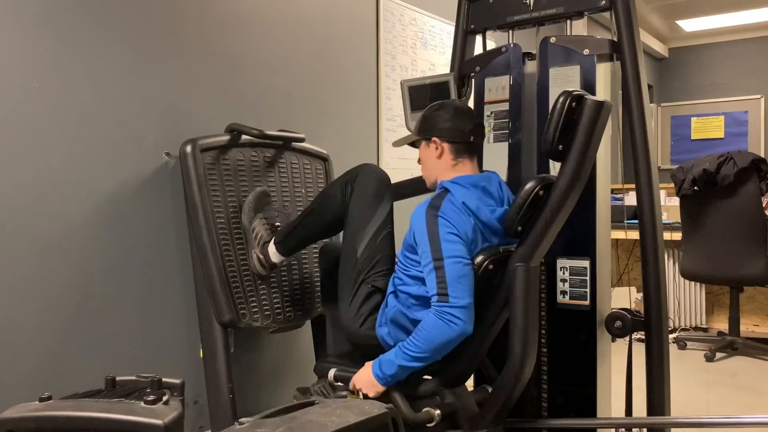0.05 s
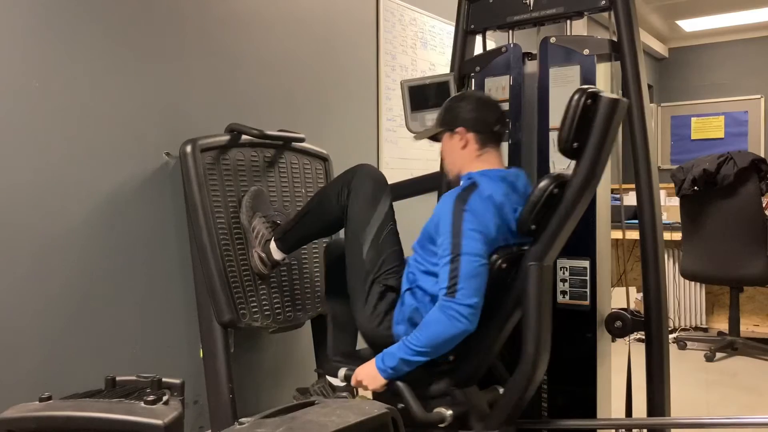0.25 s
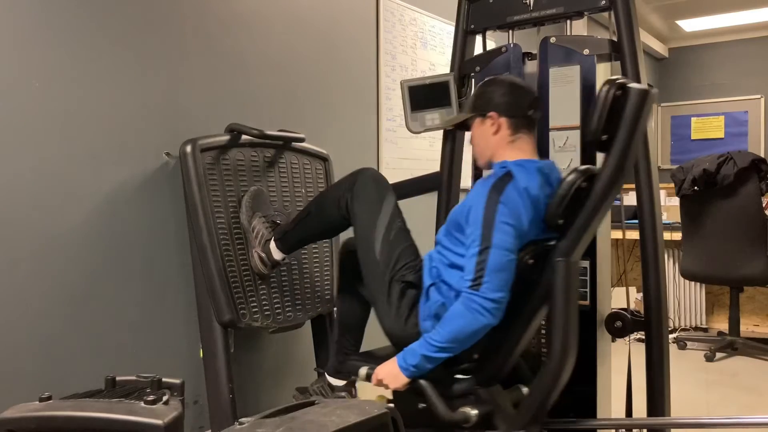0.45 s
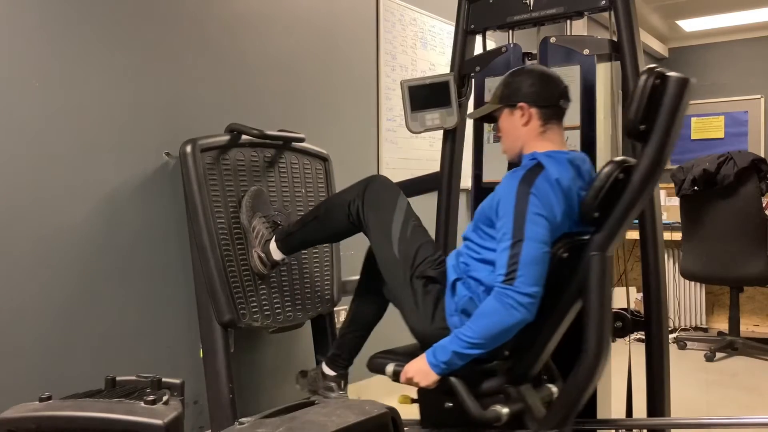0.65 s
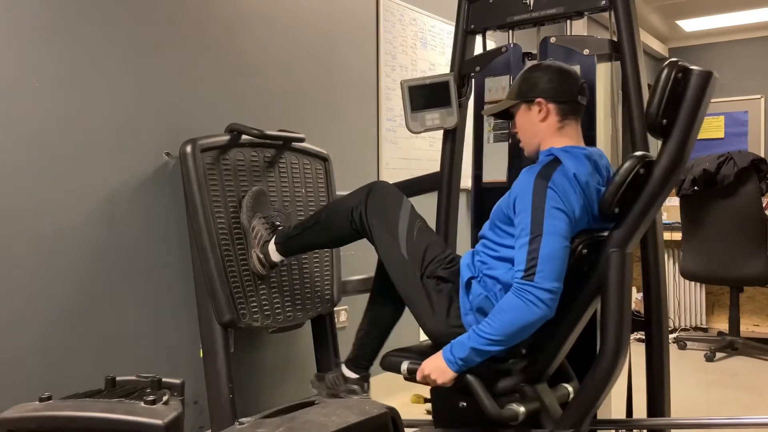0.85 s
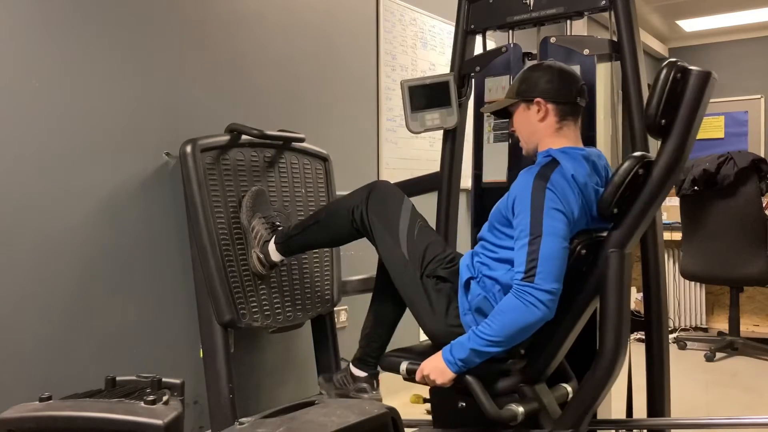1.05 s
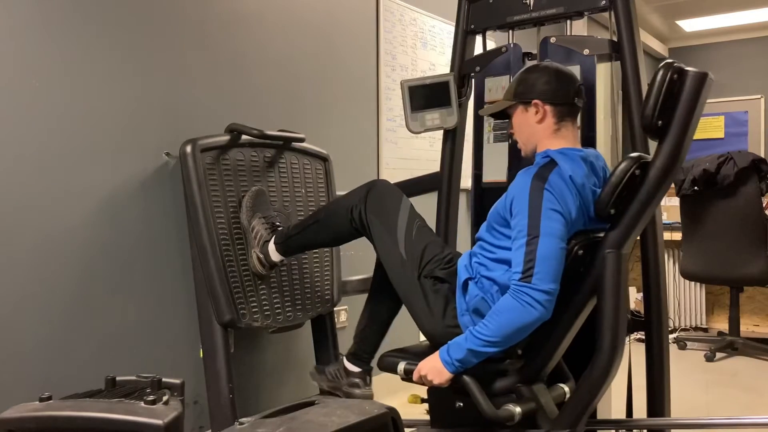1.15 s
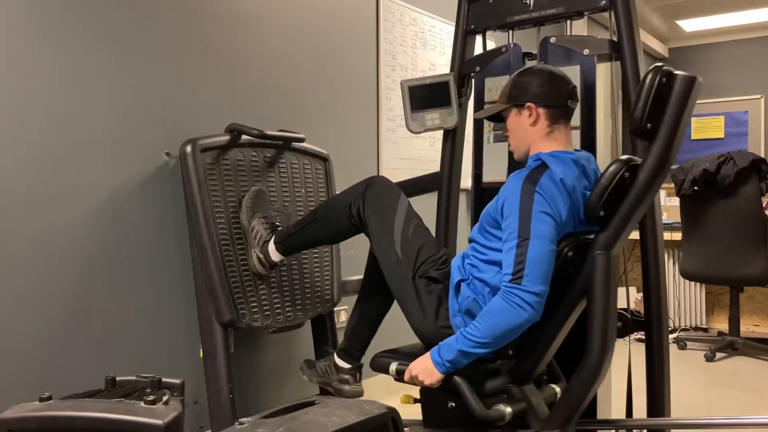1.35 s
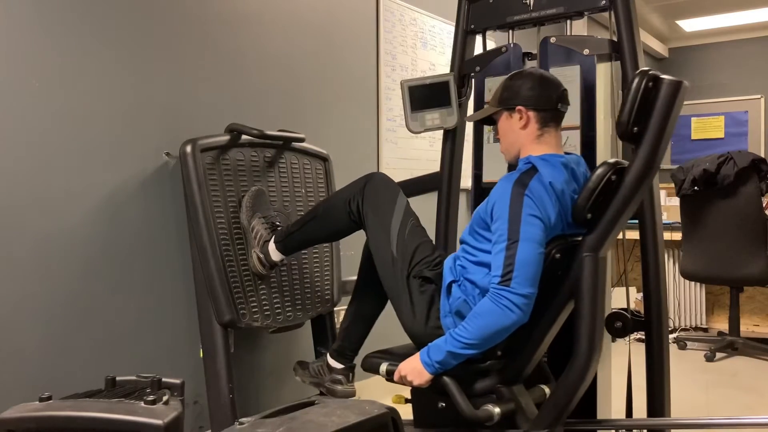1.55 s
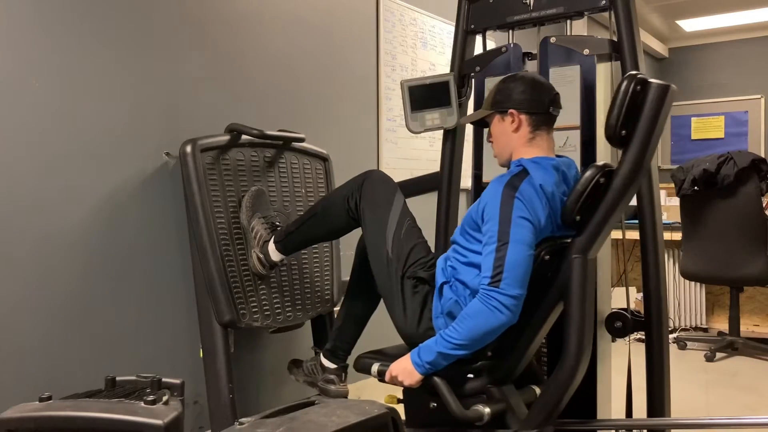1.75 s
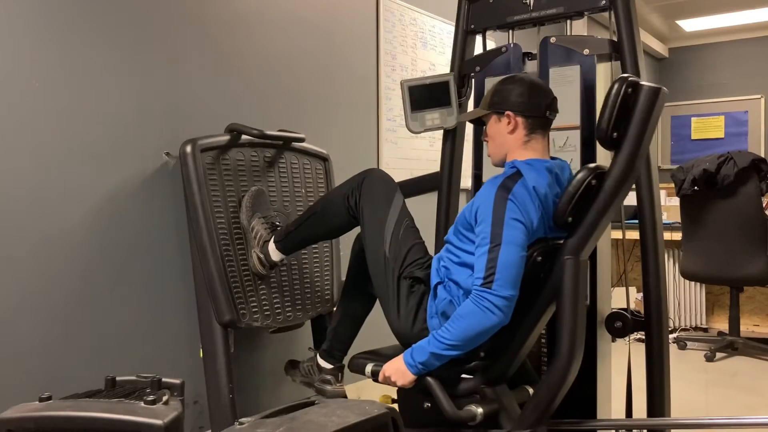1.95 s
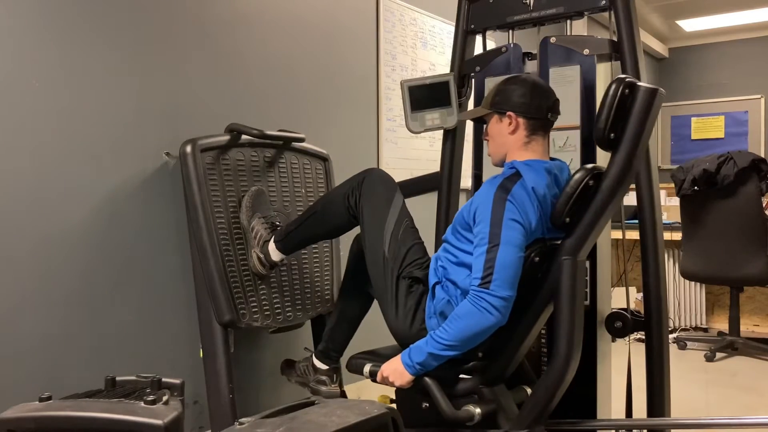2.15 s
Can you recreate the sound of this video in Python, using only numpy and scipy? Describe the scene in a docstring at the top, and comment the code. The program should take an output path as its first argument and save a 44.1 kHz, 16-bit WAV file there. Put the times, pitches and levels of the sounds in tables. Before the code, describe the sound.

A leg press clicks at 0.1 seconds and clanks at 0.2, with a short pulley squeak and a thinly ringing loose pin. Its seat judders with dull knocks, loudest from 0.25 to 0.4 seconds, and rolls out with a low rumble and faint hiss, fading by 1 second. From 1.2 it rolls softly back, with light cable ticks around 1.8 to 2. Quiet gym ventilation runs underneath.

```python
"""A click and a steel clank come first, as a leg press in a quiet gym takes up its slack.
A loose pin sings, a pulley squeaks, and the seat judders and knocks as it starts to move.
It rolls out along its rail, halts, and rolls softly back with a few ticks of the cable.
Its rollers shake the machine into a rumble, and its sleeves hiss along the guide rods.
Ventilation fills the room; two microphone ports (openings) hear the treble one after the other."""
import sys
import numpy as np
from scipy import signal
from scipy.fft import rfft, irfft, next_fast_len
from scipy.io import wavfile
from scipy.ndimage import uniform_filter1d, map_coordinates

SR = 44100
rng = np.random.default_rng(int(sys.argv[2]) if len(sys.argv) > 2 else 0)


def waveform_to_disk(signal):
    """Save audio, clipped to [-1, 1], as 16-bit WAV at the path in sys.argv[1]."""
    frames = np.transpose(np.atleast_2d(signal))
    scaled = np.clip(frames, -1, 1) * 32767
    samples = np.round(scaled).astype(np.int16)
    wavfile.write(sys.argv[1], SR, samples)


N = 97020

# Tone of the ventilation: (frequency [Hz], relative level [dB])
AIR_TONE = [(25, -78), (60, -11), (150, 7), (300, 6), (600, -9), (900, -9.5), (1600, -1.5), (3000, -6.5),
            (6000, -13.5), (9500, -26), (12000, -54), (15500, -55)]
# How long the room echoes: (frequency [Hz], time to fade by 60 dB [s])
ROOM_DECAY = [(200, 0.96), (1000, 0.26), (4000, 0.6), (12000, 0.14)]
# Hiss on the guide rods over time: (time [s], relative level [dB])
SLIDE_LEVELS = [(0.0, -104), (0.14, -63), (0.27, -69), (0.42, -59), (0.58, -59), (0.66, -61), (0.82, -72),
                (0.91, -108), (1.21, -76.5), (1.42, -69), (1.55, -71), (1.87, -72), (2.06, -75), (2.2, -99)]
# Tones of the rod hiss, the rollers' grit and a bright click: (frequency [Hz], relative level [dB])
HISS_TONE = [(2000, -32), (4000, 2), (7000, -13), (9500, -13.5), (12000, -8), (15500, -28.5)]
GRIT_TONE = [(500, 7), (900, 8), (2000, -9), (4000, -14.5), (8000, -34), (15000, -25)]
CLICK_TONE = [(500, -50), (2000, 4), (5000, 7), (9000, 2.5), (12000, 8), (15500, 5)]
# Resonances, the pitches each part likes to ring at: (frequency [Hz], width [Hz], relative level [dB])
DUCT_RESONANCES = [(892, 127, 8.5), (538, 39, 10)]
SCRAPE_RESONANCES = [(1860, 380, 0)]
PIN_RESONANCES = [(3444, 51, 6), (3570, 160, 5), (3900, 73, 0), (4264, 180, -5)]
RAIL_RESONANCES = [(152.2, 11.5, -2.5), (176, 11.3, -6.5), (195.2, 22.3, -1.5), (233.8, 24.2, -2.5)]
FRAME_RESONANCES = [(268, 24, -3), (322, 18, 0), (350, 20, 0), (432, 22, -9), (460, 22, -10), (524, 16, -5),
                    (556, 25, -11), (610, 40, -13)]
PLATE_RESONANCES = [(737, 8.8, -8), (868, 17.4, 13.5), (961, 10.3, 4), (1210, 8.3, 4.5), (1480, 104, -7.5),
                    (1923, 24, 1.5), (2450, 660, -25)]
BASE_RESONANCES = [(45, 24.8, 0), (77.8, 30.4, -5)]
PORT_RESONANCES = [(9300, 2200, 0)]
# Rubs of the seat's carriage: (time [s], length [s], level [dB])
CARRIAGE_RUBS = [(0.533, 0.1, -44.5), (0.656, 0.17, -48.5)]
# Pulley squeaks: (time [s], length [s], middle pitch [Hz], level [dB])
PULLEY_SQUEAKS = [(0.204, 0.031, 1431, -24), (.535, 0.045, 1280, -33.5)]
# The loose pin singing: (time [s], relative level [dB])
PIN_LEVELS = [(.191, -48), (.199, -28), (.232, -29), (.247, -36), (.256, -52), (.29, -52), (.3, -44),
              (.31, -50), (.32, -43), (.352, -44), (.36, -62), (.374, -60), (.381, -47), (.425, -48),
              (.44, -62), (.52, -60), (.62, -68)]
# Cable and pulley clicks: (time [s], relative level [dB], dullness [below 0 is brighter], rise time [s])
CABLE_CLICKS = [(0.0902, -50.5, 1, 0.00025), (0.0926, -40.5, 1, 0.0022), (0.188, -36.5, 0.38, 0.0039),
                (.198, -25.5, 0.94, 0.012), (1.769, -52.5, -0.9, .0002), (1.829, -50.5, -0.083, .006),
                (1.847, -50.5, -1.1, .004), (1.9422, -48.5, -0.83, 0.0016), (1.953, -57, -1.1, .0003)]
# Hits on the steel: (time [s], relative level [dB])
STEEL_HITS = [(.093, -29.5), (.197, -27), (.212, -48)]
# Notes in one clank: (frequency [Hz], relative level [dB], time to fade by 60 dB [s])
STEEL_NOTES = [(824, -1, .07), (1140, -6, .05), (1470, -2, .04), (2010, -6, .05), (2210, -4, .04),
               (2600, -8, .04), (2980, -9, .04), (3770, 1, .025), (4090, -5, .025), (4480, -4, .025),
               (6800, -12, .02), (9150, -14, .03)]
# How strongly each part rumbles: (time [s], rail [dB], frame [dB], weight plates [dB], base [dB])
RUMBLE_LEVELS = [(0.0, -56, -44.5, -56, -42), (0.08, -49.5, -62, -55, -59), (0.1, -40.5, -43.5, -44, -51),
                 (0.17, -47.5, -44, -48.5, -46), (0.21, -47, -29, -24, -60), (0.25, -29.5, -21, -21.5, -46),
                 (0.28, -40, -26, -24, -47), (0.32, -20, -20.5, -27.5, -51), (0.35, -31.5, -19, -30.5, -23),
                 (0.39, -23, -26, -30.5, -40), (0.43, -27, -20, -32.5, -31), (0.47, -30, -27.5, -34, -37.5),
                 (0.54, -27, -32.5, -34, -31), (0.56, -28, -27, -36.5, -43), (0.62, -33.5, -31.5, -38, -36),
                 (0.67, -36, -34, -37.5, -50), (0.72, -39.5, -42.5, -33.5, -43),
                 (0.75, -35.5, -36.5, -39.5, -44), (0.91, -42.5, -47.5, -51, -44),
                 (1.16, -52, -65.5, -56.5, -55), (1.49, -50, -55.5, -53, -51.5),
                 (2.2, -60, -65, -57.5, -66)]
# Knocks of the seat: (time [s], relative level [dB], pitch [Hz])
SEAT_KNOCKS = [(0.099, -25, 187), (.188, -25, 560), (0.205, -21, 374), (0.222, -15, 315), (0.2443, -3, 477),
               (0.259, -16.5, 407), (0.282, -14, 358), (0.2993, -6.5, 320), (.309, -12, 194.4),
               (0.341, -4, 351), (0.376, -3, 332), (0.395, -11, 344), (0.414, -16, 357), (.423, -21.5, 325),
               (0.437, -27, 234), (0.453, -34, 350), (0.547, -26, 215), (0.682, -18, 350),
               (0.742, -28, 232), (0.826, -32, 182), (1.118, -37.5, 153), (1.348, -33.5, 145),
               (1.535, -35.5, 170), (1.836, -39, 185), (1.854, -38.5, 148)]
# How alike the two ports sound: (frequency [Hz], likeness [0 to 1])
PORT_LIKENESS = [(100, .98), (350, .9), (800, .55), (2000, .5), (4500, .35), (6000, .6), (6800, .99),
                 (15700, .99)]
# How late the left port hears steady sounds and struck ones: (frequency [Hz], lag [cycles])
STEADY_LAG = [(300, 0), (2000, .22), (4500, .5), (6900, 1), (15950, 3)]
STRUCK_LAG = [(300, 0), (1700, .05), (3900, .05), (5200, .5), (6900, 1), (15950, 3)]
# How much louder the left port is: (frequency [Hz], left over right [dB])
PORT_BALANCE = [(100, -2.5), (500, 0), (2500, 2.5), (6000, -0.5)]


def amp(db):
    """Turn decibels into a number to multiply by."""
    return 10 ** (np.asarray(db) / 20)


def unit(x):
    """Scale a sound to an average power of 1."""
    return x / np.sqrt(np.mean(x ** 2) + 1e-20)


def along(points, hz):
    """Read between the rows of a (frequency, value) table, on a log frequency scale."""
    freqs, values = np.transpose(points)
    return np.interp(np.log(hz + 1), np.log(freqs + 1), values)


def curves(rows):
    """Turn each dB column of a time table into one gain per sample."""
    times, *columns = np.transpose(rows)
    return [amp(np.interp(np.arange(N) / SR, times, db)) for db in columns]


def wobble(rate, depth_db):
    """A gain that glides through `rate` random values a second."""
    values = rng.standard_normal(int(N * rate / SR) + 4)
    return unit(amp(depth_db * map_coordinates(values, [np.arange(N) * rate / SR])))


def filtered(x, response):
    """Change the strength and timing of each frequency in x."""
    size = next_fast_len(N + SR // 2)
    return irfft(rfft(x, size) * response(np.fft.rfftfreq(size, 1 / SR)), size)[..., :N]


def body(peaks):
    """The filter of an object that rings at these resonances."""
    return lambda f: sum((-1) ** k * amp(db) * 1j * f * width / (hz * hz - f * f + 1j * f * width)
                         for k, (hz, width, db) in enumerate(peaks))


def colour(points):
    """The filter that follows a tone table."""
    return lambda hz: amp(along(points, hz))


def grains(rate, depth_db):
    """Two gritty noises that swell together under one unsteady contact force."""
    return rng.standard_normal((2, N)) * wobble(rate, depth_db)


def even(x, window_s=0.04):
    """Soften chance swells that last longer than the window."""
    power = np.abs(uniform_filter1d(x ** 2, size=round(window_s * SR)))
    return x / np.sqrt(power + 0.27)


def add(out, start, x):
    """Mix x into out at a start time in seconds."""
    i = round(start * SR)
    out[:, i:i + x.shape[1]] += x[:, :N - i]


def ventilation(level_db=-54):
    """A steady rush of air, coloured by the ringing of its duct."""
    tone = lambda hz: amp(along(AIR_TONE, hz)) * (1 + 2 * np.abs(body(DUCT_RESONANCES)(hz)))
    return amp(level_db) * unit(filtered(rng.standard_normal((2, N)), tone))


def room_echo(x):
    """The room answers a sound, and each frequency dies away at its own speed."""
    hz, t, spectrum = signal.stft(rng.standard_normal((2, SR // 2)), SR, nperseg=256)
    fade = amp(-60 * t / along(ROOM_DECAY, hz)[:, None])
    tail = signal.istft(spectrum * fade, SR, nperseg=256)[1]
    delayed = np.pad(x, ((0, 0), (300, 0)))
    return signal.fftconvolve(delayed, tail / np.linalg.norm(tail[0]), axes=1)[:, :N]


def rod_hiss():
    """Sleeves (bushings) hiss as they slide on the guide rods."""
    level, = curves(SLIDE_LEVELS)
    return amp(7) * level * unit(filtered(grains(27, depth_db=1.2), colour(HISS_TONE)))


def carriage_scrapes():
    """The carriage under the seat rubs, with a gritty sound that swells and fades."""
    t = np.arange(N) / SR
    level = sum(amp(db) * np.sin(np.pi * np.clip((t - start) / length, 0, 1))
                for start, length, db in CARRIAGE_RUBS)
    return level * unit(filtered(grains(67.3, depth_db=3.0), body(SCRAPE_RESONANCES)))


def pulley_squeaks(pitch_rise=0.12):
    """The pulley gives short, rough tones that climb in pitch as they swell and fade."""
    out = np.zeros((2, N))
    for start, length, hz, db in PULLEY_SQUEAKS:
        t = np.arange(round(length * SR)) / SR
        jitter = 0.069 * np.cumsum(rng.standard_normal((2, SR // 10)), axis=1)[:, :len(t)]
        phase = 2 * np.pi * hz * t * (1 + pitch_rise * (t / length - 1) / 2)
        add(out, start, amp(db) * np.sin(np.pi * t / length) * np.sin(phase + jitter))
    return out


def loose_pin(settled_hz=3545, sag_hz=45, settle_s=0.08):
    """A loose pin rattles and sings an unsteady note that sags in pitch."""
    t = np.arange(N) / SR
    start, end = PIN_LEVELS[0][0], PIN_LEVELS[-1][0]
    level, = curves([(start - 0.01, -90)] + PIN_LEVELS + [(end + 0.2, -90)])
    wander = 0.53 * np.log([wobble(120, depth_db=8.7), wobble(120, depth_db=8.7)])  # radians
    hz = settled_hz + sag_hz * np.exp(-np.abs(t - start) / settle_s)
    rattle = unit(filtered(grains(90, depth_db=4), body(PIN_RESONANCES)))
    tone = np.sin(2 * np.pi * np.cumsum(hz) / SR + wander + [[0], [np.pi / 2]])
    return amp(3) * level * tone + amp(-4.5) * uniform_filter1d(level, size=SR // 30) * rattle


def cable_clicks(dull_db_per_octave=7.5):
    """Cable and pulley crack: each click is a tick of noise and a dying rattle."""
    out, t = np.zeros((2, N)), np.arange(SR // 6) / SR
    hz = np.fft.rfftfreq(len(t), 1 / SR)
    octaves = np.log2((hz + 300) / 11000)
    fade = amp(-4 - 60 * t / 0.0018) + amp(-60 * t / 0.039) + amp(-13.5 - 60 * t / 0.2)
    for start, db, dullness, rise in CABLE_CLICKS:
        tone = amp(along(CLICK_TONE, hz) - dullness * dull_db_per_octave * octaves)
        noise = irfft(rfft(rng.standard_normal((2, len(t)))) * tone, len(t))
        add(out, start, amp(db) * noise * fade * (1 - np.exp(-t / rise)))
    return out


def steel_clanks(rise_s=0.005):
    """The pin that selects the weight and the top plate ring with many short notes at once."""
    out, t = np.zeros((2, N)), np.arange(SR // 3) / SR
    for start, db in STEEL_HITS:
        ring = np.zeros((2, len(t)))
        for hz, note_db, decay_s in STEEL_NOTES:
            chance = rng.standard_normal(3)  # varies the note's level and its two phases
            fade = amp(note_db + 2 * chance[0] - 60 * t / decay_s)
            ring += fade * np.sin(2 * np.pi * hz * t + 3 * chance[1:, None])
        add(out, start, amp(db) * ring * (1 - np.exp(-t / rise_s)))
    return out


def seat_rolling(stop_s=1.87, stop_fade_s=0.078, stop_db=-8):
    """Rollers shake the rail, frame, weight plates and base; the rail quietens as the seat stops."""
    rail_level, frame_level, plate_level, base_level = curves(RUMBLE_LEVELS)
    rough_force = grains(60.22, depth_db=5.5)
    rail = even(unit(filtered(rough_force, body(RAIL_RESONANCES))))
    frame = even(unit(filtered(rough_force, body(FRAME_RESONANCES))))
    fine_force = grains(89.54, depth_db=1.5)
    plate_ring = unit(filtered(fine_force, body(PLATE_RESONANCES)))
    grit = unit(filtered(fine_force, colour(GRIT_TONE)))
    plates = even(unit(plate_ring + amp(6.5) * grit))
    base = even(unit(filtered(rng.standard_normal((2, N)), body(BASE_RESONANCES))))
    stopping = amp(stop_db * np.clip((np.arange(N) / SR - stop_s) / stop_fade_s, 0, 1))
    return rail_level * stopping * rail + frame_level * frame + plate_level * plates + base_level * base


def seat_knocks(cycles_to_peak=1.39):
    """The seat judders with soft, padded blows, each only a few vibrations long."""
    out, t = np.zeros((2, N)), np.arange(SR // 20) / SR
    for start, db, hz in SEAT_KNOCKS:
        age = t * hz / cycles_to_peak
        swell = age ** 2 * np.exp(2 - 2 * age)
        add(out, start, amp(db - 8.0) * swell * np.sin(2 * np.pi * hz * t + [[0], [1.5]]))
    return out


def ports(pair, lag):
    """Blend two versions of a sound so the ports hear it partly alike, the left one later."""
    angle = lambda hz: np.arccos(np.clip(along(PORT_LIKENESS, hz), 0, 1)) / 2
    shared, side = filtered(pair, lambda hz: np.array([np.cos(angle(hz)), np.sin(angle(hz))]))
    freqs, cycles = np.transpose(lag)
    delay = lambda hz: np.exp(-1j * np.pi * np.outer([1, -1], np.interp(hz, freqs, cycles)))
    return filtered(np.array([shared + side, shared - side]), delay)


def scene():
    """Mix the struck parts and their echo with the steady sounds."""
    knocks, clicks, clanks = seat_knocks(), cable_clicks(), steel_clanks()
    echo = amp(-10.5) * room_echo(knocks) + room_echo(amp(-4) * clicks + amp(-2.5) * clanks)
    struck = knocks + clicks + clanks + echo + loose_pin() + pulley_squeaks()
    steady = seat_rolling() + rod_hiss() + carriage_scrapes() + ventilation()
    return ports(struck, STRUCK_LAG) + ports(steady, STEADY_LAG)


def record(dry):
    """The two ports differ in level and ring in the treble; the deepest and highest sounds are cut."""
    def microphone(hz, low_hz=44, top_hz=15750):
        balance = amp(np.array([[0.5], [-0.5]]) * along(PORT_BALANCE, hz))
        band = hz ** 4 / (hz ** 4 + low_hz ** 4) * (hz < top_hz)
        return balance * (1 + body(PORT_RESONANCES)(hz)) * band
    return filtered(dry, microphone)


dry = scene()
out = record(dry)
waveform_to_disk(out)
```